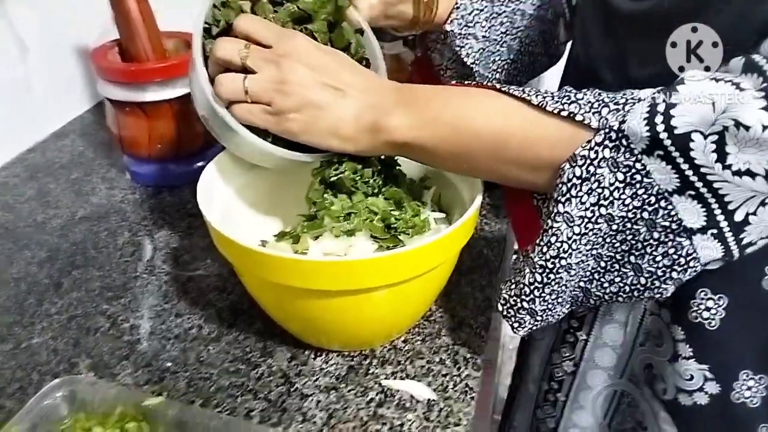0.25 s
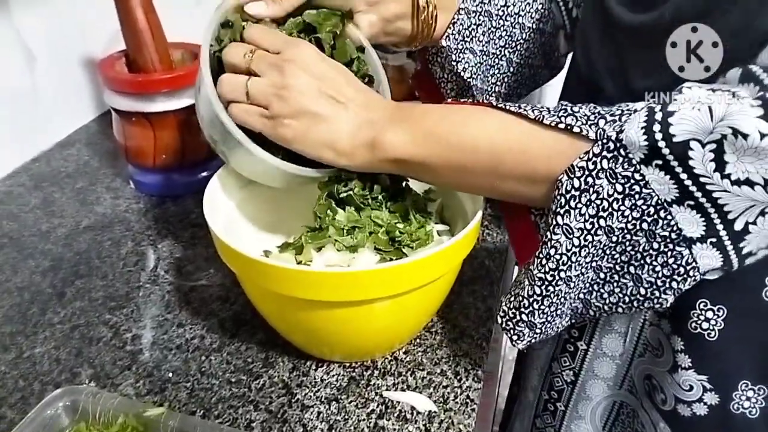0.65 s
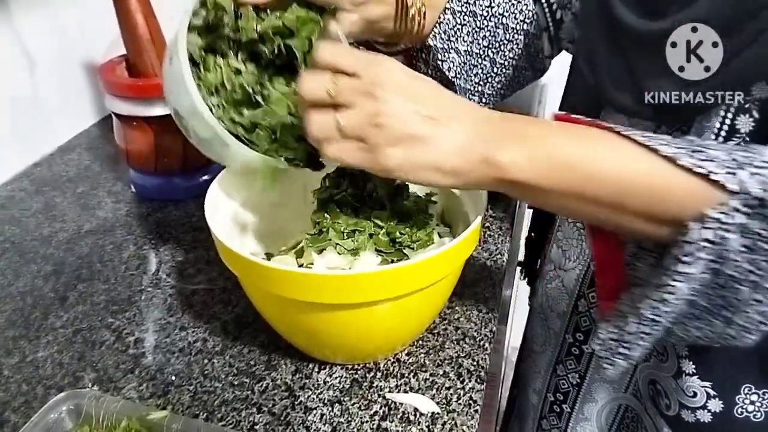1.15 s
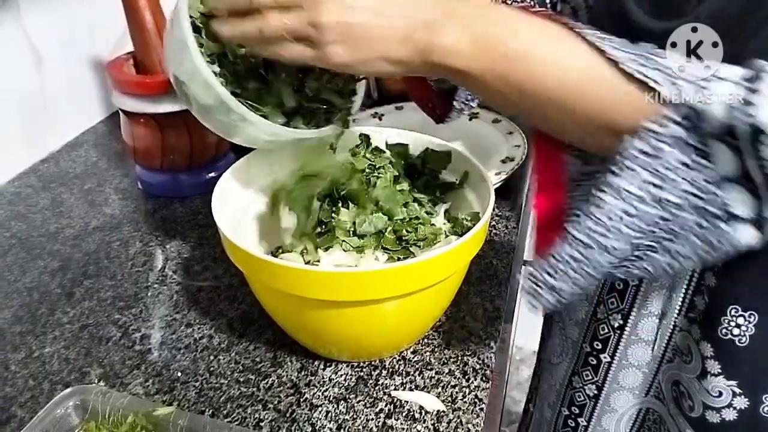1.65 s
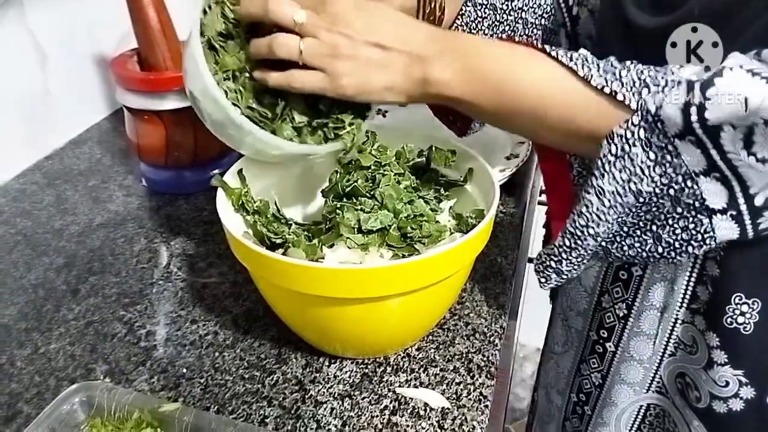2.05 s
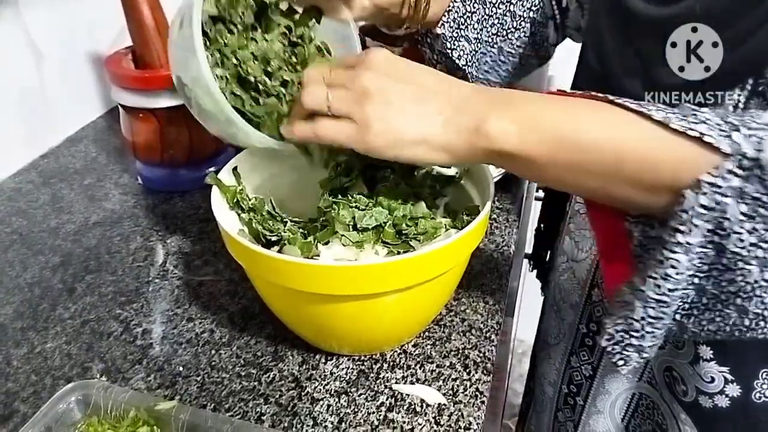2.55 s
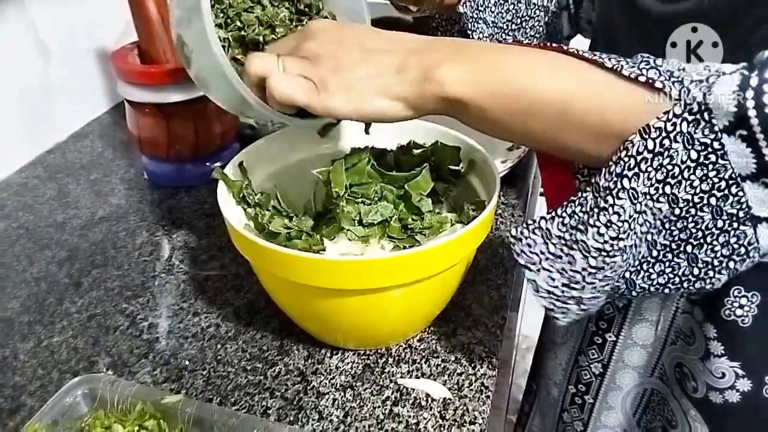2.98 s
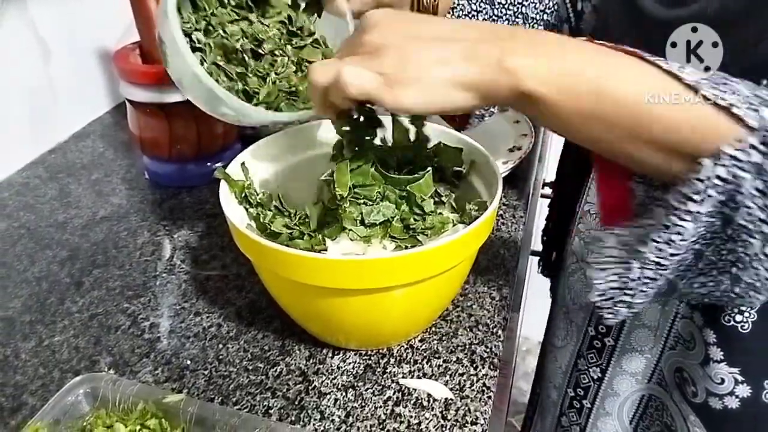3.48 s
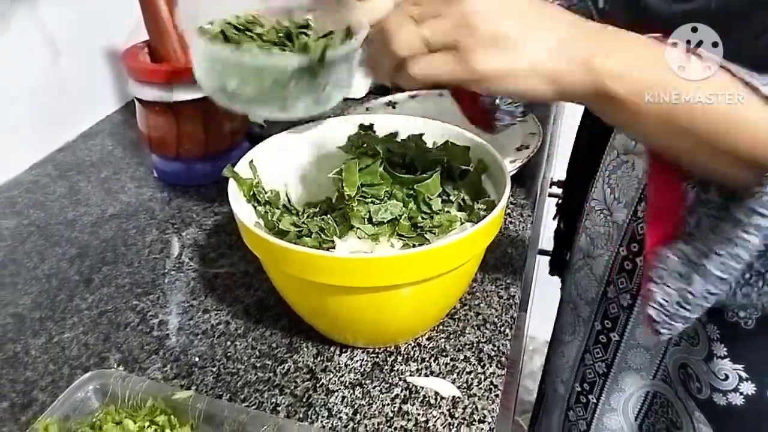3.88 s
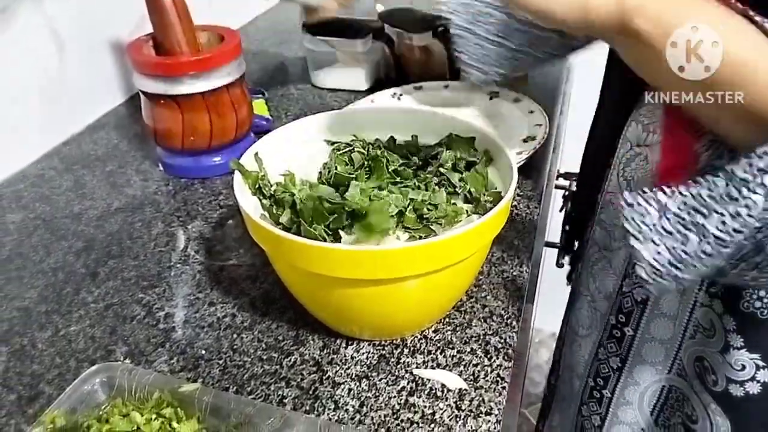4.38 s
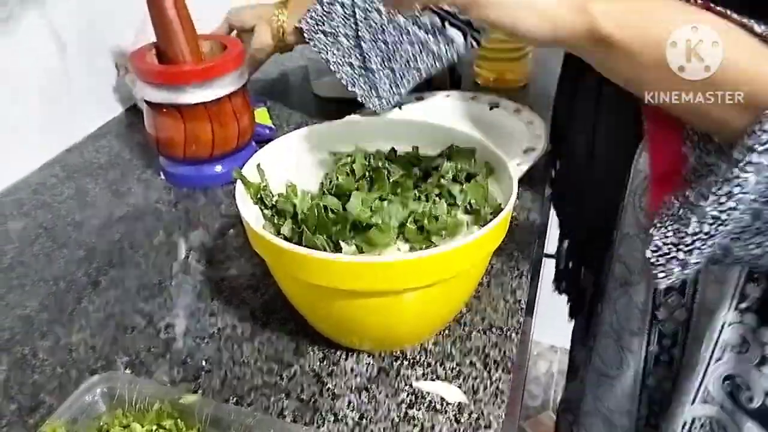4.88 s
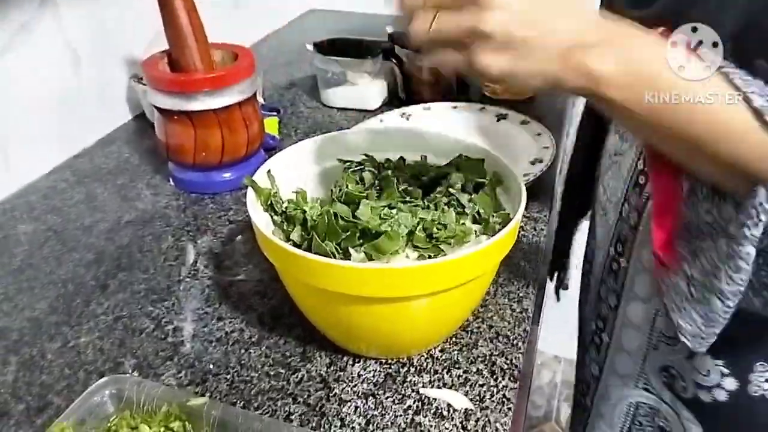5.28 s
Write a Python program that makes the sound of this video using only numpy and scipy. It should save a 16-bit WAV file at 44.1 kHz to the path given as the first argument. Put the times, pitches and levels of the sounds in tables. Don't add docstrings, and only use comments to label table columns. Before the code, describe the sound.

Frozen chopped leaves crackle and crunch as hands rake them from a plastic tub into a bowl, then the tub clatters onto stone.

```python
import sys
import numpy as np
from scipy import signal
from scipy.fft import rfft, irfft, next_fast_len
from scipy.io import wavfile
from scipy.ndimage import map_coordinates

SR = 44100
rng = np.random.default_rng(int(sys.argv[2]) if len(sys.argv) > 2 else 0)


def nominal_scale(level):
    x = np.asarray(level, float) / 20
    return 10 ** x


def dump_mix(stems):
    frames = np.atleast_2d(stems).T
    limited = np.clip(frames, -1, 1)
    pcm = np.round(limited * 32767).astype(np.int16)
    wavfile.write(sys.argv[1], SR, pcm)


N = 243766

# (peak time [s], rise [s], crunch [dB], contact with the tub [dB], frost brightness [dB])
STROKES = [(0.095, 0.0043, -38.5, 3.5, -3), (0.34, 0.048, -40.5, -16, -11), (0.45, 0.01, -37, 7.5, -3),
           (0.51, 0.061, -46, 14, -3), (0.678, 0.0088, -27.5, 10.5, -4), (0.74, 0.19, -36.5, 0, -3),
           (0.93, 0.075, -37, -15, -4), (1.012, 0.065, -31.5, 5.5, -8.5), (1.16, 0.033, -37, 0, -17),
           (1.27, 0.05, -46, 18, -18), (1.328, 0.037, -38, -15, -11), (1.62, 0.01, -43, -4, 1),
           (1.66, 0.032, -34.5, -10, -27), (1.806, .008, -37.5, -10.5, -1), (1.87, 0.019, -33, -13, -10),
           (1.994, 0.0036, -36, -7, 2), (2.04, 0.04, -35.5, 0.5, -1), (2.105, 0.041, -31.5, -1, -6.5),
           (2.195, 0.0077, -27.5, 3, -1.5), (2.248, 0.042, -31.5, 0, -5), (2.518, 0.11, -34, 5, -6),
           (2.7, 0.012, -39, -14, -7), (3.0, 0.027, -33, -2.5, -7), (3.109, 0.13, -30.5, -6.5, -9.5),
           (3.28, 0.067, -42, -11, -6)]
# (frequency [Hz], level per Hz [dB])
LEAF_COLOUR = [(1350, -50), (2300, -23), (2610, -2.5), (3210, 0.5), (5470, -1.5), (6580, -9), (8190, -32),
               (9500, -37), (12400, -15), (20900, -120)]
# (frequency [Hz], level per Hz [dB])
FROST_COLOUR = [(4120, -11.5), (7000, 0.5), (8400, -4.5), (11200, -0.5), (14800, 3.5), (15900, -15),
                (16000, -8), (16200, -31)]


def unit(x):
    return x / np.sqrt(np.mean(x ** 2) + 1e-20)


def along(points, hz):
    f, v = np.transpose(points)
    return np.interp(np.log(hz + 1), np.log(f + 1), v)


def curves(rows):
    s, *columns = np.transpose(rows)
    return [np.interp(np.arange(N) / SR, s, column) for column in columns]


def wobble(rate):
    knots = rng.standard_normal(int(N * rate / SR) + 4)
    return map_coordinates(knots, [np.arange(N) * rate / SR])


def filtered(x, response):
    m = next_fast_len(N + SR // 2)
    return irfft(rfft(x, m) * response(np.fft.rfftfreq(m, 1 / SR)), m)[..., :N]


def coloured(x, spectrum):
    return filtered(x, lambda hz: nominal_scale(along(spectrum, hz)))


def resonant(x, peaks):
    def response(hz):
        total = 0
        for k, (centre, width, db) in enumerate(peaks):
            damping = 1j * hz * width
            total = total + (-1) ** k * nominal_scale(db) * damping / (centre ** 2 - hz ** 2 + damping)
        return total
    return filtered(x, response)


def add(track, s, sound):
    part = track[round(s * SR):][:len(sound)]
    part += sound[:len(part)]


def burst(t60, attack):
    t = np.arange(SR // 4) / SR
    kicks = np.sign(rng.standard_normal(len(t)))
    return nominal_scale(-60 * t / t60) * (1 - np.exp(-t / attack)) * kicks


def crackle(rate, spread_db, life, bed, alike):
    start = rng.random(N) < rate / SR * nominal_scale(3 * wobble(25))
    size = start * nominal_scale(2 * spread_db * np.minimum(rng.exponential(size=N), 3))
    power = signal.lfilter([1], [1, -np.exp(-1 / (life * SR))], size)
    shared, left, right = rng.standard_normal((3, N))
    noise = np.sqrt(alike) * shared + np.sqrt(1 - alike) * np.array([left, right])
    return np.sqrt(power / power.mean() + bed ** 2) * noise


def flakes(rate, centre_hz, cycles, spread_db):
    when, size, place, pitch = rng.random((4, int(rate * N / SR)))
    hz = np.clip(centre_hz * np.exp(1.1 * (pitch - 0.5)), 100, 9000)[:, None]
    t = np.arange(160) / SR
    gain = nominal_scale(2 * spread_db * np.minimum(-np.log(size + 1e-9), 3))[:, None]
    tone = gain * np.exp(-t * hz / cycles) * np.sin(2 * np.pi * hz * t)
    start = (when * (N - 300)).astype(int)[:, None] + np.arange(160)
    gap = (place * 24).astype(int)[:, None]
    return unit(np.array([np.bincount((start + k * gap).ravel(), tone.ravel(), N) for k in (0, 1)]))


def effort(steady_db, stroke_db, fall_db):
    t = np.arange(0, N / SR, 1 / 1000)
    peak, rise = np.transpose(STROKES)[:2, :, None]
    swell_db = 10.5 * (t - peak) / rise
    shape_db = np.where(t < peak, swell_db, fall_db * (peak - t))
    strokes = np.sqrt(np.sum(nominal_scale(stroke_db[:, None] + shape_db) ** 2, axis=0))
    return np.hypot(nominal_scale(steady_db), np.interp(np.arange(N) / SR, t, strokes))


def hollow(x):
    # (time [s], share [0-1])
    emptying = [
        (0, 0.29),
        (1.4, 0),
        (1.9, 0.75),
        (5.53, 1),
    ]
    # (frequency [Hz], width [Hz], level [dB])
    full_tub = [(374, 48, -20), (540, 18.4, 8), (1060, 9.9, -21), (1297, 8.3, -8)]
    emptier_tub = [(308, 11, -29), (806.5, 28.7, 10.5), (1445, 450, -3)]
    # (frequency [Hz], level per Hz [dB])
    wall = [(140, -100), (230, -8.5), (453, -4.5), (538, 3.5), (611, -4.5), (809, 3), (927, -74),
            (2000, -4.5), (2600, -26), (4400, -120)]
    share = curves(emptying)[0]
    full = resonant(x * np.sqrt(1 - share), full_tub)
    emptier = resonant(x * np.sqrt(share), emptier_tub)
    return full + emptier + nominal_scale(-5) * coloured(x, wall)


def leaves():
    # (time [s], crunch [dB], contact with the tub [dB], frost brightness [dB])
    grip = [(0, -42, 8.5, -7.5), (0.27, -44, -0.5, -1), (0.43, -60, 11, -13), (0.55, -50, 1, -11),
            (0.9, -43, 5, -15), (1.37, -44, 0.5, -5), (1.6, -53.5, -18, 1.5), (1.96, -43, 1, -5.5),
            (2.42, -38, -6.5, -7), (2.65, -45, -6, -11.5), (2.82, -47.5, -15, -9), (2.95, -49.5, -14, -14),
            (3.28, -34, 0, -9), (3.68, -56.5, -10, 0.5), (3.88, -49, -44, -6), (4.06, -65.5, 1, -1),
            (4.22, -52.5, -17, -1), (4.72, -52, -42, -11.5), (4.86, -59.5, 1, -26)]
    # (frequency [Hz], level per Hz [dB])
    rub_colour = [(710, -6.5), (1200, -6.5), (1370, -0.5), (1700, 0.5), (2270, 8), (2500, 1), (3250, -22),
                  (5500, -120)]
    grip_db, contact_db, bright_db = curves(grip)
    rake_db, drag_db, frost_db = np.transpose(STROKES)[2:]
    fall_db, tub_fall_db, frost_fall_db = 172, 171, 230
    fractures = crackle(rate=800, spread_db=7.0, life=0.0021, bed=0.73, alike=0.042)

    flicks = flakes(rate=900, centre_hz=4110, cycles=4.1, spread_db=2)
    crunch = unit(unit(coloured(fractures, LEAF_COLOUR)) + 0.42 * flicks)
    crunch = effort(grip_db, rake_db, fall_db) * nominal_scale(-2.0 + 2.3 * wobble(30)) * crunch

    stroke_rub_db = rake_db - 5 + 0.39 * np.minimum(drag_db, 0)
    rub = effort(grip_db - 6, stroke_rub_db, fall_db)
    rub = rub * nominal_scale(-2.5 + 2.54 * wobble(29.52)) * unit(coloured(fractures, rub_colour))

    sizzle = effort(grip_db + bright_db, rake_db + frost_db, frost_fall_db)
    sizzle = sizzle * nominal_scale(-0.5 + 1.4 * wobble(31.24)) * unit(coloured(fractures, FROST_COLOUR))

    clumps = crackle(rate=110, spread_db=0.5, life=0.011, bed=0.56, alike=0.89)
    rattle = effort(grip_db + contact_db, rake_db + drag_db, tub_fall_db)
    rattle = rattle * nominal_scale(-3.5) * unit(hollow(clumps))

    before_release = np.arange(N) < grip[-1][0] * SR
    return before_release * (crunch + rub + rattle + sizzle)


def snaps():
    # (time [s], peak [dB], centre [Hz], top sizzle [dB])
    stems = [(0.0925, -22, 5440, -7), (0.2208, -20, 2820, -5), (0.3358, -29, 1850, -2),
             (0.4407, -18.5, 1840, -8), (0.5, -16, 1930, -7), (0.583, -24, 2370, -28),
             (0.673, -13.5, 2300, 1), (0.823, -14.5, 4300, -13), (0.919, -25, 3750, -22),
             (1.128, -27, 3350, -9), (1.1524, -20, 2960, -4.5), (1.3175, -30, 4100, -22),
             (1.525, -29, 4500, -26), (1.6088, -16.5, 4200, -6), (1.686, -22.5, 3860, -17),
             (1.7843, -23, 3760, -21), (1.8213, -22, 3800, -4), (1.8549, -15.5, 3540, -7.5),
             (1.995, -19, 2350, -20), (2.0951, -19.5, 2380, -3), (2.1934, -23, 2070, -12),
             (2.6826, -20.5, 2600, -13), (2.786, -27.5, 3140, -8), (2.869, -25.5, 2320, -12),
             (3.0054, -17, 3650, -21), (3.1215, -15.5, 3980, -6), (3.3191, -21, 3600, -22),
             (3.726, -33.5, 1530, -7), (3.7848, -30.5, 2790, -21), (3.8007, -25, 2030, -17)]
    # (time [s], peak [dB], centre [Hz])
    crumbs = [
        (4.29, -37, 2080),
        (4.4896, -29.5, 3200),
        (4.5364, -35, 4660),
        (4.6518, -34, 3750),
    ]
    # (time [s], peak [dB], centre [Hz])
    chips = [(0.094, -21, 5260), (0.101, -31, 2400), (0.119, -20, 2600), (0.18, -31, 4500),
             (0.232, -29, 3300), (0.319, -33, 6000), (0.4828, -26, 2260), (0.6125, -26, 2070),
             (0.712, -24, 2500), (1.19, -34, 2900), (1.255, -27, 4120), (1.6097, -18, 3950),
             (1.629, -24, 5500), (1.642, -19, 3000), (1.687, -21, 3600), (1.79, -25, 3800),
             (1.804, -23, 4300), (1.878, -23, 4000), (2.698, -20, 3000), (2.069, -26, 3000),
             (2.241, -23, 4500), (2.268, -28, 3500), (2.755, -25, 3500), (2.9567, -33, 4700),
             (2.995, -25, 2500), (3.232, -21, 5410), (3.243, -28, 2380), (3.3184, -22, 3600),
             (3.34, -27, 3800)]
    # (time [s], peak [dB], t60 [s])
    spits = [(2.842, -23, 0.024), (2.905, -24, 0.03), (3.651, -30, 0.036), (3.725, -41, 0.03),
             (3.875, -35, 0.045), (5.0604, -30, 0.04), (5.0645, -26.5, 0.06), (2.684, -32, 0.02),
             (4.14, -44, 0.02), (2.171, -33, 0.015), (1.99, -31, 0.03), (2, -27, 0.03), (2.698, -34, 0.02),
             (0.879, -37, 0.012), (0.78, -36, 0.012)]
    # (frequency [Hz], level per Hz [dB])
    spit_colour = [(5000, -16), (8000, -8), (10800, 1.5), (13000, 1), (15500, -5), (16200, -30)]
    stem_t60, chip_t60 = 0.064, 0.03
    crumb_top_db, chip_top_db = -8, -14
    breaks = [(*stem, stem_t60) for stem in stems]
    breaks += [(*crumb, crumb_top_db, stem_t60) for crumb in crumbs]
    breaks += [(*chip, chip_top_db, chip_t60) for chip in chips]
    tone, broad, top, spit = np.zeros((4, N))
    for s, db, hz, top_db, t60 in breaks:
        band = signal.butter(2, [hz / 1.24, hz * 1.2], "band", fs=SR)
        add(tone, s, nominal_scale(db + 1.0) * signal.lfilter(*band, burst(t60, attack=0.0012)))
        add(broad, s, nominal_scale(db - 7.5) * burst(t60, attack=0.00016))
        add(top, s, nominal_scale(db + top_db + 1.5) * burst(0.35 * t60, attack=0.0015))
    for s, db, t60 in spits:
        add(spit, s, nominal_scale(db - 3) * burst(t60, attack=0.00021))
    bright = coloured(top, FROST_COLOUR) + coloured(spit, spit_colour)
    return tone + coloured(broad, LEAF_COLOUR) + bright


def knocks():
    # (time [s], peak [dB], rim note [dB])
    wall_blows = [(0.337, -16.5, -20), (0.446, -12, -13.5), (0.483, -21, -5), (0.501, -14, 0.5),
                  (0.582, -18.5, -5.5), (0.68, -15.5, 6), (0.91, -25, 2.5), (0.974, -9.5, -33),
                  (1.242, -15, -24), (1.267, -22, -20), (1.312, -20, -20), (1.815, -30.5, -5),
                  (1.927, -24.5, -18), (2.008, -27, 3.5), (2.097, -24, 10), (2.173, -37, -14),
                  (2.192, -23, -20), (2.238, -23, -15), (2.35, -18.5, -18), (2.449, -35, -13),
                  (2.499, -26, 4), (2.868, -34.5, -6), (2.977, -35.5, 6), (3.004, -16, -8),
                  (3.058, -23, -9), (3.086, -17, -6), (3.126, -19.5, -5), (3.212, -26, 2),
                  (3.232, -25, -22), (3.271, -21.5, -11), (3.319, -20.5, -14), (3.338, -29, -14),
                  (3.42, -28, -14)]
    # (time [s], peak [dB], centre [Hz], t60 [s])
    lumps = [(0.059, -43.5, 340, 0.18), (0.328, -47, 378, 0.061), (0.446, -35, 168, 0.11),
             (0.497, -28, 370, 0.078), (0.679, -12.5, 356, 0.054), (0.976, -8, 358, 0.033),
             (0.974, -22, 530, 0.086), (1.24, -39, 380, 0.06), (1.869, -33, 193, 0.059),
             (2.026, -36, 284, 0.089), (2.088, -22, 355, 0.049), (2.19, -31, 332, 0.091),
             (2.323, -30.5, 344, 0.062), (2.481, -48.5, 254.5, 0.31), (2.99, -38, 315, 0.074),
             (3.039, -41, 350, 0.08), (4.33, -46, 206, 0.085)]
    # (frequency [Hz], width [Hz], level [dB])
    rim_notes = [(1010, 48, 4.5), (1287, 89, -2)]
    blows, rim, thuds = np.zeros((3, N))
    for s, db, rim_db in wall_blows:
        add(blows, s, nominal_scale(db + 11.5) * burst(0.016, attack=0.00021))
        add(rim, s, nominal_scale(db + rim_db + 17.0) * burst(0.016, attack=0.00076))
    t = np.arange(SR // 4) / SR
    for s, db, hz, t60 in lumps:
        swell = 1 - np.exp(-t / 0.012)
        add(thuds, s, nominal_scale(db + 3.0 - 60 * t / t60) * swell * np.sin(2 * np.pi * hz * t))
    return hollow(blows) + resonant(rim, rim_notes) + thuds


def landing():
    # (time [s], peak [dB], thud [dB], crack [dB], contact time [s])
    bounces = [(4.886, 1.5, -32, -12, 0.00083), (4.8934, -5, -37, -29, 0.00073),
               (4.9022, -1, -36, -33, 0.00094), (4.912, -2.5, -31, -30, 0.0012),
               (4.919, -13.5, -21, -21, 0.00046), (4.889, -7, -35, -16, 0.00075),
               (4.924, -7, -32, -22, 0.001), (5.052, -13, -28, -16, 0.00081),
               (5.073, -18, -28, -22, 0.00041), (5.0775, -11, -24, -25, 0.00033),
               (5.098, -12, -16, -22, 0.00046), (4.9767, -3, -30.5, -19.5, 0.00077),
               (5.058, -24.5, -4, -6, 0.00035), (5.0653, -0.5, -17.5, -18.5, 0.00044),
               (5.081, -13, -13, -24, 0.00022), (5.112, -16, -5.5, -9.5, 0.00017)]
    # (frequency [Hz], width [Hz], level [dB])
    base_notes = [(530, 135, -11.5), (788, 69, -1.5), (863, 87, 0.5), (1043, 105, 2), (1600, 360, -3.5),
                  (2300, 1360, -11.5)]
    # (frequency [Hz], level per Hz [dB])
    crack_colour = [(1060, -29), (1800, 3), (2180, 2.5), (3140, 5), (6410, -6), (8280, -19.5),
                    (13000, -17.5), (15000, -22), (16000, -60)]
    crack_lag = 0.000996
    body, thud, crack = np.zeros((3, N))
    t = np.arange(200) / SR
    for s, db, thud_db, crack_db, contact in bounces:
        push = np.sin(np.pi * np.clip(t / contact, 0, 1)) ** 2
        add(body, s, nominal_scale(db + 33.5) * push / push.sum())
        add(thud, s, nominal_scale(db + thud_db + 40.5) * np.hanning(80) / 40)
        add(crack, s + crack_lag, nominal_scale(db + crack_db + 26.5) * np.ones(1))
    low = resonant(thud, [(186, 220, -0.75), (358, 730, 0.95)])
    return resonant(body, base_notes) + low, coloured(crack, crack_colour)


def taps():
    # (time [s], peak [dB])
    touches = [
        (1.64, -19),
        (1.685, -18),
        (3.724, -26),
        (3.798, -30),
    ]
    # (frequency [Hz], width [Hz], level [dB])
    damped_base = [(810, 260, -0.5), (1270, 910, -2.5), (2600, 2000, -9.5)]
    blows = np.zeros(N)
    for s, db in touches:
        add(blows, s, nominal_scale(db + 7) * burst(0.021, attack=0.00036))
    return resonant(blows, damped_base)


def jolts():
    # (time [s], peak [dB])
    shoves = [
        (0.335, -35.5),
        (0.443, -34),
        (0.5, -29.5),
        (0.674, -22),
        (0.977, -33),
        (2.19, -26.5),
        (3.001, -39),
        (5.059, -21.5),
    ]
    push = np.zeros(N)
    for s, db in shoves:
        add(push, s, nominal_scale(db + 38.5) * np.hanning(120) / 60)
    return resonant(push, [(109, 36, 0.9), (166, 106, 1.3)])


def bangles():
    # (time [s], peak [dB])
    contacts = [
        (1.6102, -25),
        (1.7846, -23),
        (1.802, -27),
        (1.8208, -20),
        (1.8258, -23),
        (1.8557, -30),
        (3.121, -28),
    ]
    # (frequency [Hz], level [dB], t60 [s])
    partials = [(3860, -6, 0.03), (3880, 6.5, 0.024), (4420, -16, 0.024), (2855, -1, 0.077)]
    out = np.zeros(N)
    t = np.arange(SR // 8) / SR
    for s, db in contacts:
        ring = np.zeros(len(t))
        for hz, level, t60 in partials:
            ring += nominal_scale(level + rng.normal(0, 1.2) - 60 * t / t60) * np.sin(2 * np.pi * hz * t)
        add(out, s, nominal_scale(db - 9.0) * ring)
    return out


def jingle():
    # (time [s], peak [dB], t60 [s])
    slides = [
        (4.786, -39.5, 0.29),
        (4.8194, -45, 0.25),
        (5.3148, -44, 0.25),
        (5.362, -31.5, 0.12),
        (5.4002, -44, 0.23),
    ]
    # (frequency [Hz], width [Hz], level [dB])
    shimmer = [(10760, 150, 4.5), (12200, 170, 0), (13100, 250, 2), (14300, 250, -3), (15200, 250, 5),
               (6300, 300, -10)]
    rub = np.zeros(N)
    for s, db, t60 in slides:
        add(rub, s, nominal_scale(db + 2.5) * burst(t60, attack=0.0016))
    return resonant(rub, shimmer)


def sleeve():
    middle, half_length = 4.37, 0.24
    cloth_hz, width_hz = 1880, 610
    swell = np.exp(-((np.arange(N) / SR - middle) / half_length) ** 2)
    band = signal.butter(2, [cloth_hz - width_hz / 2, cloth_hz + width_hz / 2], "band", fs=SR)
    cloth = unit(signal.lfilter(*band, rng.standard_normal(N)))
    return nominal_scale(-54 + 1.5 * wobble(25.13)) * swell * cloth


def microphones(x):
    # (frequency [Hz], phase [radians])
    lead = [(0, 0), (1030, .9), (1810, 3.1), (3360, 11), (6980, 22), (15400, 53)]
    # (frequency [Hz], difference [dB])
    tilt = [(60, 7), (200, 1.5), (380, -3), (700, 7), (1290, -1.5), (2380, -5), (4400, -9), (7600, -7),
            (10000, 10), (13000, -3.5)]
    f, radians = np.transpose(lead)
    side = np.array([[0.5], [-0.5]])
    return filtered(x, lambda hz: nominal_scale(side * along(tilt, hz)) * np.exp(1j * side * np.interp(hz, f, radians)))


def kitchen(x):
    # (frequency [Hz], t60 [s])
    decay = [(100, 0.13), (400, 0.82), (2000, 0.69), (6000, 0.42), (14000, 0.34)]
    diffuse_hz = 420
    delay = 45
    out = np.zeros((2, N + 2 * SR))
    step = SR // 3
    for start in range(0, N, step):
        hz, t, z = signal.stft(rng.standard_normal((2, SR * 3 // 4)), SR, nperseg=256)
        dying = z * nominal_scale(-60 * t / along(decay, hz)[:, None])
        tail = signal.istft(dying, SR, nperseg=256)[1]
        tail = tail / np.linalg.norm(tail[0])
        wet = signal.fftconvolve(x[None, start:start + step], tail, axes=1)
        out[:, start + delay:start + delay + wet.shape[1]] += wet
    mid, side = out[:, :N]
    side = filtered(side, lambda hz: hz ** 2 / (hz ** 2 + diffuse_hz ** 2))
    return np.array([mid + side, mid - side]) / np.sqrt(2)


def air():
    # (frequency [Hz], level per Hz [dB])
    air_colour = [(12, -42), (20, -5), (146, -0.5), (683, -11.5), (786, 4.5), (1340, -45), (1980, 0),
                  (2550, -7.5), (5590, -9), (8040, -22), (13700, -18), (14900, -19), (16200, -32)]
    # (time [s], level [dB])
    lull = [
        (0, -6),
        (3.95, -3.5),
        (4.05, -3),
        (4.135, -9),
        (4.16, -3),
        (5.2, 0.5),
        (5.53, 1.5),
    ]
    mid, side = coloured(rng.standard_normal((2, N)), air_colour)
    side = coloured(side, [(40, 0), (130, -4), (500, -6), (2000, -1.0)])
    level = nominal_scale(-56.5 + curves(lull)[0] + 0.75 * wobble(4.46))
    return level * unit(np.array([mid + side, mid - side]))


def scene():
    near = leaves() + snaps() + knocks() + jolts() + bangles() + jingle() + taps() + sleeve()
    tub, crack = landing()
    direct = microphones(near + tub + nominal_scale(-10.5) * crack)
    room = kitchen(nominal_scale(-5.0) * near[0] + nominal_scale(-1.5) * (tub + crack))
    heard = direct + room * nominal_scale([[-1.2], [1.2]])
    bass_hz = 102
    return filtered(heard, lambda hz: (1j * hz / (bass_hz + 1j * hz)) ** 2) + air()


def low_pass(x):
    return signal.sosfilt(signal.butter(12, 16520, fs=SR, output="sos"), x)


def record(dry):
    held = dry / (1 + np.abs(dry / 0.97) ** 8) ** 0.125
    top_hz = 15650
    mix = filtered(held, lambda hz: hz < top_hz)
    return low_pass(mix)


dry = scene()
out = record(dry)
dump_mix(out)
```